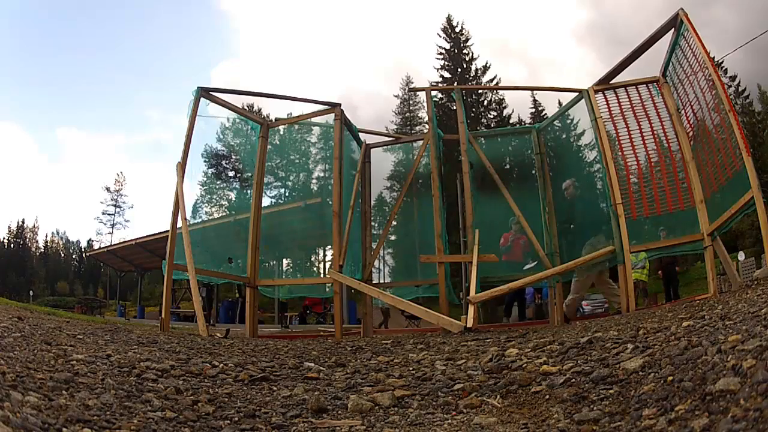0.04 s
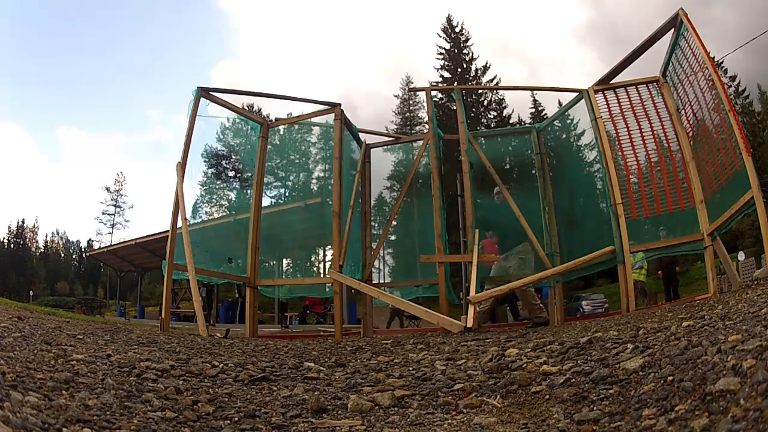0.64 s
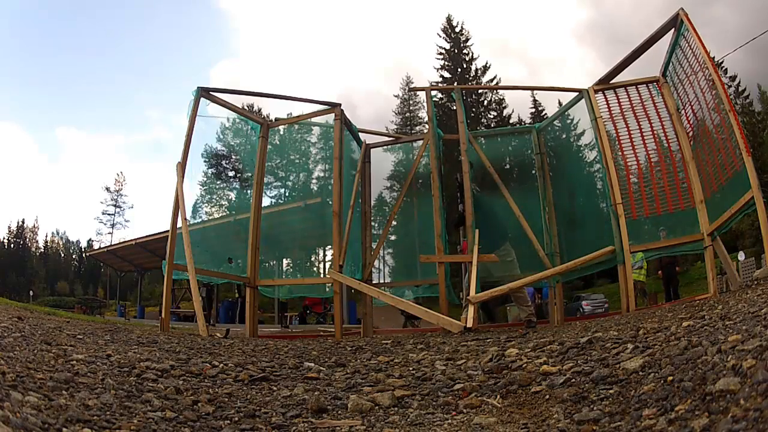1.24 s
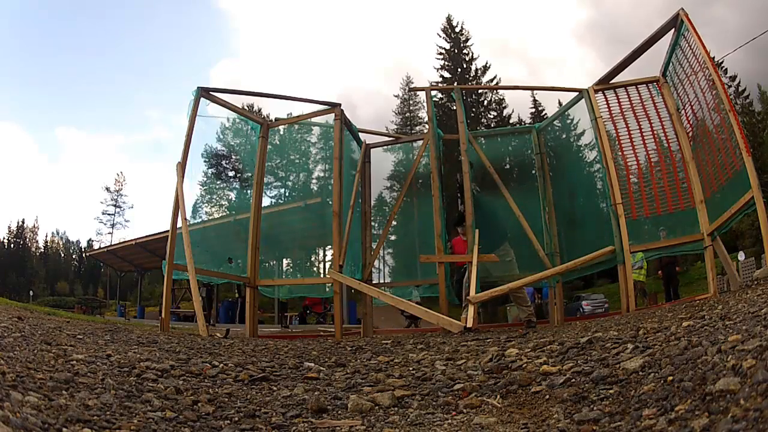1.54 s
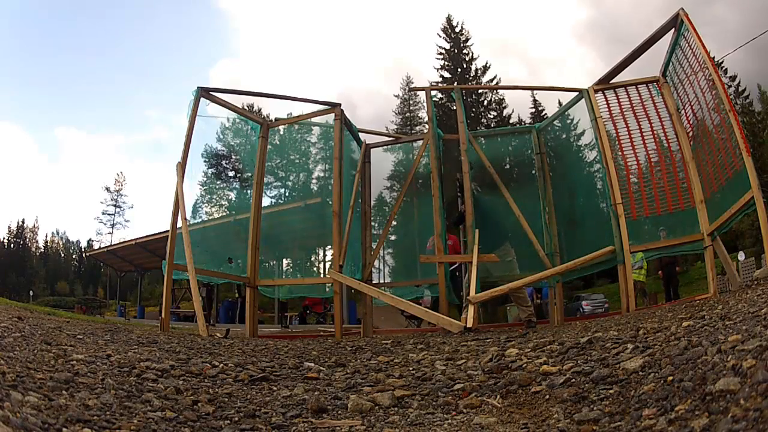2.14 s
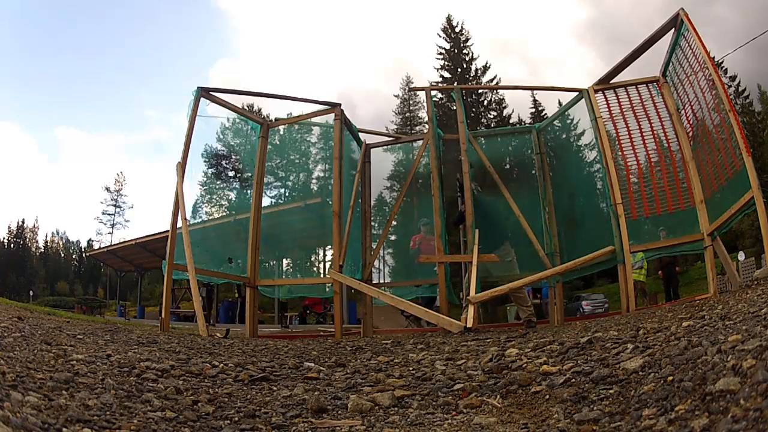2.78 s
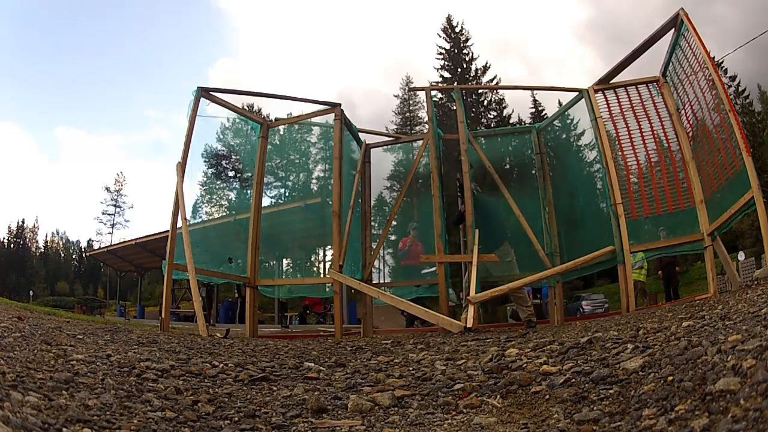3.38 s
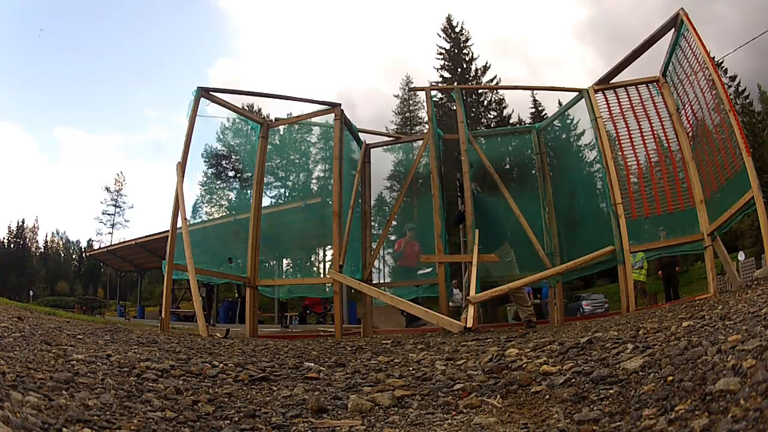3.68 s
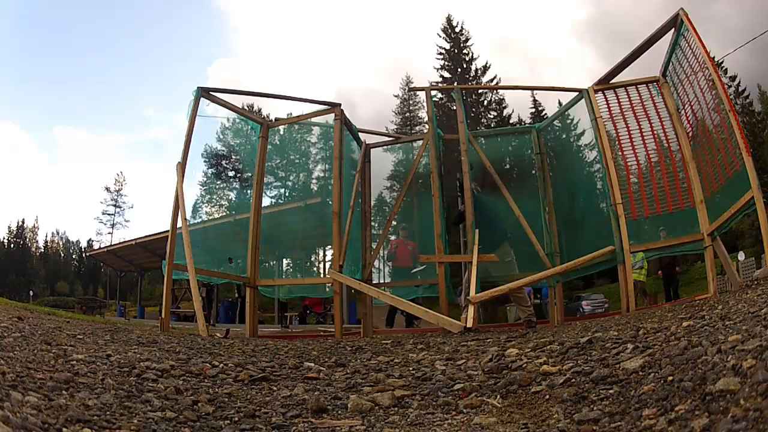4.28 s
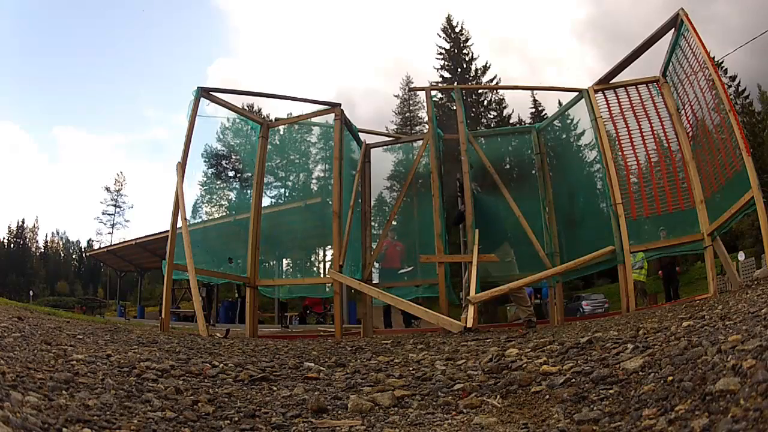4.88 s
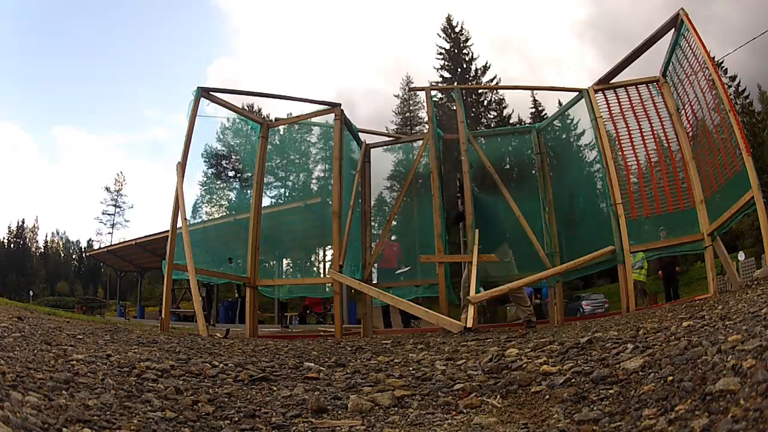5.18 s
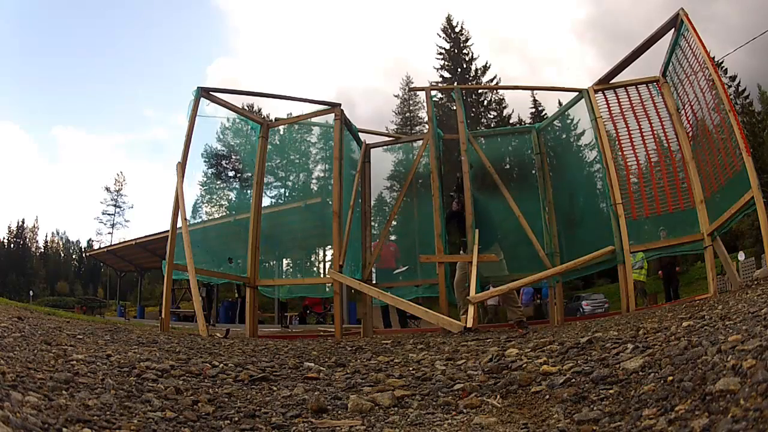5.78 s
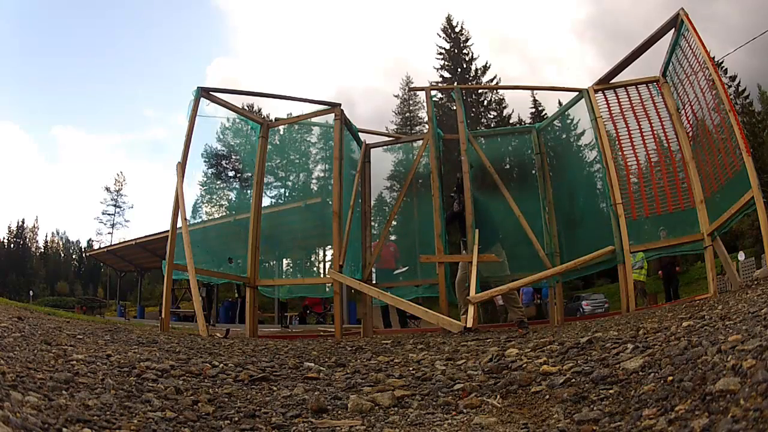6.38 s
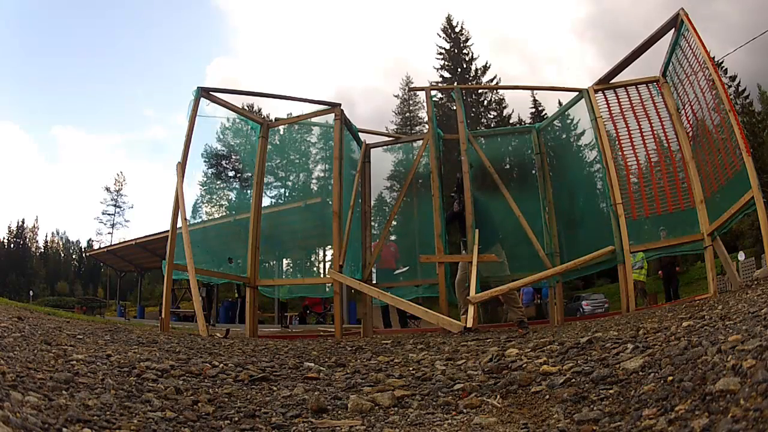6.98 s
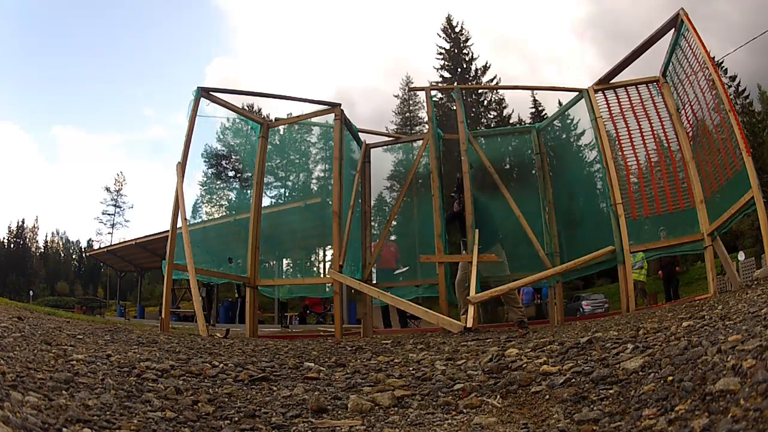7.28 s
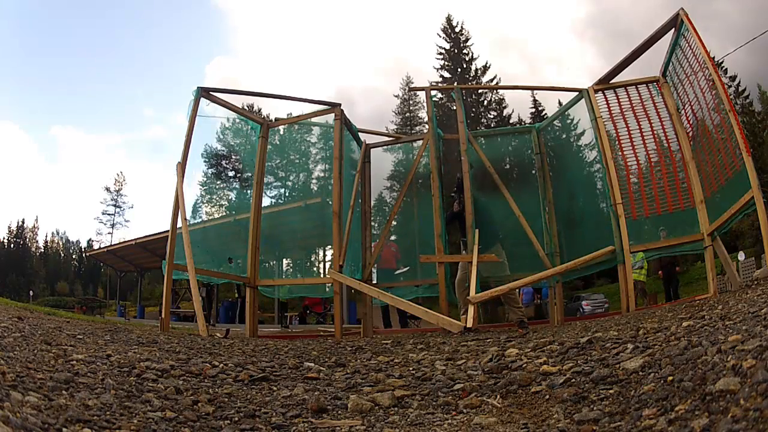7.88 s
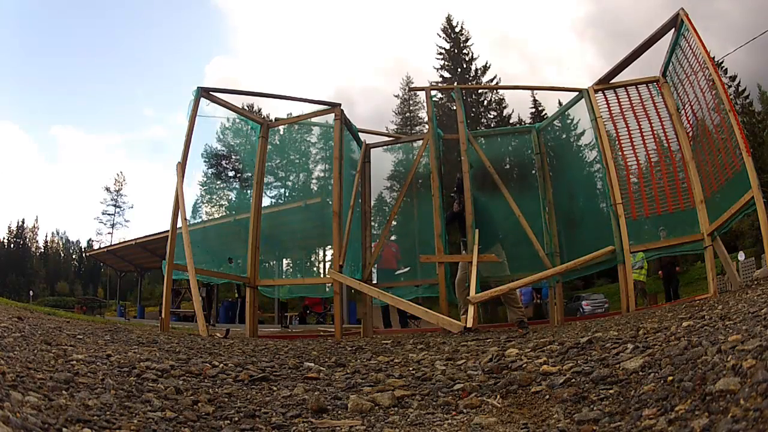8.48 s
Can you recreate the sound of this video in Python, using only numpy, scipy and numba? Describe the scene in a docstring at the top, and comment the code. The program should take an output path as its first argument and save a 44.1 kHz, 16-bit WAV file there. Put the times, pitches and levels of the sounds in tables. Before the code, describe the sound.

At a shooting range ringed by forest, a few muffled, far-off gunshots roll through quiet air. Six loud rifle shots follow nearby, fired two at a time with short pauses, and one distant shot sounds between the second and third pairs. Each close crack distorts the ground-level microphone, which dips in level and recovers as a low boom and a bright, hissing echo spread through the trees and fade.

```python
"""Rifles thump from distant bays of an outdoor range, over a faint wash of woods.
Then three pairs of shots go off close by: each is the crack of a bullet flying faster than sound,
followed by the muzzle blast. Sheds and banks slap it back, then the forest returns a long hissing roll.
The near shots overload a small cased camera lying on the gravel, which turns itself down after each."""
import sys
import numpy as np
from scipy import signal
from scipy.fft import rfft, irfft
from scipy.io import wavfile
from scipy.ndimage import uniform_filter1d
from numba import njit

SR = 44100
rng = np.random.default_rng(int(sys.argv[2]) if len(sys.argv) > 2 else 0)


def unload_wav(signal):
    """Save mono or channel-first audio to the path in sys.argv[1] as 16-bit WAV at rate SR, clipped to [-1, 1]."""
    wavfile.write(
        sys.argv[1],
        SR,
        np.round(np.clip(np.atleast_2d(signal).T, -1, 1) * 32767).astype(np.int16),
    )


N = 381024
TIME = np.arange(N) / SR
FREQS = np.fft.rfftfreq(N, 1 / SR)
FIRST_ECHO_S = .047  # delay at which the scatter from the range has fully built up
FOREST_NEAR_S, TALL_TREES_S, FOREST_FAR_S = .275, .393, .61  # echo delays: near edge, tall trees, far side


def undb(db):
    """Turn decibels into a gain."""
    return 10 ** (np.asarray(db) / 20)

def noise(colour):
    """Fresh noise of rms 1, shaped by (f/Hz, level/dB) points and falling steeply beyond them."""
    hz, db = np.transpose(colour)
    octave, marks = np.log2(FREQS + 1), np.log2(hz)
    octaves_beyond = np.abs(octave - np.clip(octave, marks[0], marks[-1]))
    gain = undb(np.interp(octave, marks, db) - 20 * octaves_beyond)
    x = irfft(rfft(rng.standard_normal(N)) * gain, N)
    return x / x.std()

def wander(rate_hz):
    """Glide between random values, mostly within -1 to 1."""
    step = int(SR / rate_hz)
    return uniform_filter1d(np.repeat(rng.standard_normal(N // step + 1), step), step)[:N]

def fade(t60):
    """Die away by 60 dB every t60 seconds."""
    return np.exp(-np.minimum(np.log(1000) * TIME / t60, 40))

def swell(rise_s, t60):
    """Grow evenly for rise_s, then die away."""
    return np.minimum(TIME / rise_s, 1) * np.exp(-np.log(1000) * np.maximum(TIME - rise_s, 0) / t60)

def burst(length_s, edge_s):
    """Start at once, hold, then collapse."""
    return .5 - .5 * np.tanh((TIME - length_s) / edge_s)

def thud(hz, cycles):
    """A short swing of air pressure that grows for `cycles` cycles, then dies away."""
    turns = hz * TIME[:SR // 5]
    age = turns / cycles
    return np.sin(2 * np.pi * turns) * age * np.exp(1 - age)

def add(out, x, start_s):
    """Mix x into out, starting at start_s."""
    i = int(round(start_s * SR))
    x, i = x[max(-i, 0):], max(i, 0)
    out[i:i + len(x)] += x[:N - i]


def air(level_db=-49):
    """The faint, wavering wash of the surrounding woods."""
    wash = noise([(30, -4), (150, -7), (550, 2.5), (1100, -14), (2200, -11), (5500, -49),
                  (9000, -29), (15000, -23.5)])  # f/Hz, level/dB
    return undb(level_db + wander(5.3)) * wash

# Tone colour of the hiss in near and distant echoes: f/Hz, level/dB
HISS = [(500, -31), (900, 3), (1200, -3), (1500, -2), (2100, 2.5), (2550, -2), (3000, 0), (4000, -11),
        (5200, -19), (6400, -22.5), (9000, -11), (10700, -16), (15000, -19)]
# Tone colour of the distant shots' rolling echo: f/Hz, level/dB
FAR_ROLL = [(130, -20), (260, -5.5), (420, -3.5), (600, -1.5), (740, -4.5), (950, -22)]
# Shots in distant bays: t/s, thump level/dB, thump f/Hz, echo delay/s, echo rise/s,
# roll level/dB, hiss level/dB
FAR_SHOTS = [(-.4, -36, 70, .2, 0.29, -34, -43), (.144, -33.5, 65, 0.16, 0.12, -36, -46),
             (.651, -27, 72, 0.095, 0.18, -35.5, -45), (1.647, -29, 64.7, 0.012, 0.32, -34.5, -42.5),
             (1.850, -28, 185, 0.059, 0.088, -40, -38.5), (6.037, -26.5, 174, 0.057, 0.074, -37, -37.5)]
def far_shots(roll_t60=4.4, hiss_t60=3.22):
    """A dull thump, a knock and a slap come over the banks; the rest arrives late via the treetops."""
    out = np.zeros(N)
    for t, thump_db, thump_hz, delay_s, rise_s, roll_db, hiss_db in FAR_SHOTS:
        add(out, undb(thump_db) * thud(thump_hz, cycles=.45), t)
        add(out, undb(-36) * thud(200, cycles=.73), t + .0165)  # knock off the shooting stage
        add(out, undb(thump_db - 6) * thud(605, cycles=.62), t + .033)  # slap
        rumble = noise([(35, 0), (70, 3.1), (130, .21)]) * fade(1.0)
        add(out, undb(thump_db - 18) * rumble, t)
        roll = undb(roll_db + wander(29.8)) * noise(FAR_ROLL) * swell(rise_s, roll_t60)
        hiss = undb(hiss_db) * noise(HISS) * swell(rise_s, hiss_t60)
        add(out, roll + hiss, t + delay_s)
    return out

def through_trees(rise, sag, fall):
    """Echo gain: rises to the forest's near edge, nearly holds inside, then falls. All rates in dB/s."""
    early_s = np.maximum(FOREST_NEAR_S - TIME, 0)
    inside_s = np.clip(TIME, FOREST_NEAR_S, FOREST_FAR_S) - FOREST_NEAR_S
    late_s = np.maximum(TIME - FOREST_FAR_S, 0)
    reached = np.clip(TIME / FIRST_ECHO_S - 1, 0, 1)  # the trees answer only after the nearer echoes
    return reached * undb(-rise * early_s - sag * inside_s - fall * late_s)

# Tone colour of the bright echo from needles and tall trees: f/Hz, level/dB
SIZZLE = [(1200, -22), (2200, 1), (3000, 6.5), (4200, 1), (5600, -16.5), (6500, -18), (7600, -6),
          (8900, -3.5), (10600, -29), (15000, -7)]
def forest_echo(far_rise_s=.06):
    """Needles and twigs scatter the treble anew each time; tall trees and the far side add surges."""
    bounced_once = undb(-32) * through_trees(rise=78, sag=-.5, fall=39.5)
    bounced_often = undb(-39) * through_trees(rise=70, sag=-2.5, fall=16.5)
    needles = undb(-34) * through_trees(rise=44, sag=6.5, fall=81)
    out = np.hypot(bounced_once, bounced_often) * noise(HISS) + needles * noise(SIZZLE)
    add(out, undb(-26) * noise(SIZZLE) * swell(.0067, t60=.52), TALL_TREES_S)
    add(out, undb(-35) * noise(HISS) * swell(far_rise_s, t60=.78), FOREST_FAR_S - far_rise_s)
    flicker_db = .9 * wander(70)
    return undb(flicker_db) * out

def spreading(first_db, db_per_decade, absorb_db_per_s):
    """Echo gain: the later sound returns, the farther it has spread and the more is soaked up."""
    delay_ratio = TIME / FIRST_ECHO_S
    spread_db = db_per_decade * np.log10(np.maximum(delay_ratio, 1))
    too_early_db = 60 * np.clip(1 - delay_ratio, 0, 1)
    return undb(first_db - spread_db - absorb_db_per_s * TIME - too_early_db)

# Tone colours of the deep boom, the roll above it and the crack off wood and earth: f/Hz, level/dB
BOOM = [(25, -29), (55, -13.5), (110, -6), (160, -1), (230, -2.5), (300, -4), (500, -45)]
ROLL = [(150, -29), (250, -0.5), (400, 1), (580, 0), (730, -2.5), (850, -11.5), (1100, -25.5), (2000, -34)]
RATTLE = [(600, 0), (1000, 0), (2200, -1), (3200, -3.5), (4500, -13.5), (6400, -26), (9000, -16),
          (15000, -16)]
# How boom and roll fade: first level/dB, spreading loss/dB per tenfold delay, absorption/dB per s
BOOM_FADE = (-19.5, 15.2, 14.3)
ROLL_FADE = (-9.5, 24.3, 9.1)
# Single echoes off sheds and earth banks: t/s after the shot, level/dB, f/Hz
SLAPS = [(0.0164, 2, 428), (0.034, -7.5, 400), (0.055, -7.5, 533), (0.123, -12, 390), (.184, -14, 313),
         (.260, -20.5, 202), (.322, -17, 382), (.338, -30, 180), (.351, -20, 365), (0.399, -22.5, 240),
         (0.422, -19.5, 232)]
def terrain_echo(rattle_db=-12, rattle_loss_db_per_s=22):
    """Ground, banks and trunks return a low echo; each shed or bank adds a thud and some of the crack."""
    trunks = undb(-29.5) * through_trees(rise=73, sag=2.5, fall=18)
    out = np.hypot(spreading(*BOOM_FADE), undb(-15.5) * trunks) * noise(BOOM)
    flutter = undb(2.1 * wander(60.53))
    out += flutter * np.hypot(spreading(*ROLL_FADE), trunks) * noise(ROLL)
    for delay_s, db, hz in SLAPS:
        add(out, undb(db) * thud(hz, cycles=.8), delay_s)
        rattle = noise(RATTLE) * fade(.069)
        add(out, undb(db + rattle_db - rattle_loss_db_per_s * delay_s) * rattle, delay_s)
    return out

def stage_clatter():
    """The crack bounces about the nearby frames and screens and soon dies."""
    out = np.zeros(N)
    add(out, undb(-19) * noise(HISS) * swell(.011, t60=.21), start_s=.035)
    return out

# Tone colour of the bullet's crack: f/Hz, level/dB
CRACK = [(400, -10.5), (1500, 5), (2900, -4), (4500, -4.5), (6200, -7.5), (9000, -14.5), (15000, -14)]
def bullet_crack(ring_hz=2900):
    """The bullet outruns sound, making a sharp snap with a brief ring."""
    ring = np.sin(2 * np.pi * ring_hz * TIME) * fade(.022)
    snap = undb(-13.5) * noise(CRACK) - undb(-11) * ring
    return snap * (burst(.0015, .0013) + undb(-4) * burst(.01263, .001))

# Tones ringing between gravel and stage walls: f/Hz, level/dB, time to fade by 60 dB/s
BLAST_TONES = [(172.5, 1, 0.049), (275, -6.5, 0.14), (377, 0, 0.035), (623, -2.5, 0.072),
               (711, -4.5, 0.096), (1047, -3, 0.032), (1530, -11, 0.036)]
# Tone colour of the rushing muzzle gas: f/Hz, level/dB
GAS = [(200, 5), (500, 19.5), (1000, 0), (1600, 0), (3000, -7.5), (6000, -18), (9000, -6), (15000, -30)]
def muzzle_blast(ring_db, gas_db):
    """Gas rushes out of the barrel, and the blast rings briefly between gravel and walls."""
    ring = sum(undb(db) * np.sin(2 * np.pi * hz * TIME) * fade(t60) for hz, db, t60 in BLAST_TONES)
    gas = noise(GAS) * fade(.058)
    return (undb(ring_db) * ring + undb(gas_db) * gas) * burst(.027, .0011)

def rifle(ring_db, swing_db, crack_db, gas_db, muzzle_lag_s=.0034, swing_hz=52):
    """The crack arrives first, the blast just behind it; a slow swing of air pressure lies under both."""
    out = undb(crack_db) * bullet_crack()
    add(out, muzzle_blast(ring_db, gas_db), muzzle_lag_s)
    swing = np.sin(2 * np.pi * swing_hz * TIME) * burst(.02, .0049)
    return out - undb(swing_db - 8) * swing

# The close shots: t/s; relative level/dB of blast ring, pressure swing, crack, gas, terrain echo
# and forest echo; extra forest delay/s
NEAR_SHOTS = [(2.1867, 0, 1.5, 3, -2, 1, 0.5, .012), (2.837, 1.5, 0, 2, -2.5, 1.5, -0.5, .012),
              (4.1551, -8.5, -3, -2, -2.5, 0.5, -0.5, 0), (4.8284, -6, 0, -0.5, -3.5, 0.5, -1.5, -0.0013),
              (7.1026, -0.5, 3.5, -0.5, -5, 1, 0, -.013), (7.7367, 1.5, 4.5, -5, -3.5, 1, -0.5, -0.012)]
def near_shots():
    """Shots with their echoes; the shooter moves between pairs, so the forest answers sooner or later."""
    out = np.zeros(N)
    terrain, clatter = terrain_echo(), stage_clatter()  # these stand still, so every shot shares them
    for t, ring_db, swing_db, crack_db, gas_db, terrain_db, forest_db, forest_lag_s in NEAR_SHOTS:
        shot = rifle(ring_db, swing_db, crack_db, gas_db)
        add(out, shot + clatter + undb(terrain_db) * terrain, t)
        add(out, undb(forest_db) * forest_echo(), t + forest_lag_s)
    return out

def scene():
    """Everything that reaches the camera, in one channel."""
    return (near_shots() + far_shots() + air())[None]


@njit
def gain_control(x, threshold, lag_s, depth_db, attack_s, release_db_per_s):
    """The camera reacts late to an overload, turns itself far down, then creeps back up."""
    y, cut_db, lag = np.zeros(len(x)), 0., int(lag_s * SR)
    for i in range(len(x)):
        if i >= lag and abs(y[i - lag]) > threshold:
            cut_db += (depth_db - cut_db) / (attack_s * SR)
        else:
            cut_db = max(cut_db - release_db_per_s / SR, 0.)
        y[i] = x[i] * 10 ** (-cut_db / 20)
    return y

# Pitches that the camera's case boosts or dulls: f/Hz, width/Hz, level/dB
CASE_RESONANCES = [(9200, 900, 2), (11400, 450, 6), (12000, 450, -11), (12600, 400, 5), (13300, 700, -3),
                   (15050, 500, 3)]
def record(dry, ceiling=.69, low_cut_hz=16, top_cut_hz=15500):
    """Blasts overload the input; the case colours the treble; deep bass and the very top are cut."""
    ducked = gain_control(dry[0], threshold=.55, lag_s=.0105, depth_db=20., attack_s=.0012,
                          release_db_per_s=60.)
    clipped = ducked / (1 + (ducked / ceiling) ** 6) ** (1 / 6)  # rounds off the peaks
    case_db = sum(db * np.exp(-2 * ((FREQS - hz) / width) ** 2) for hz, width, db in CASE_RESONANCES)
    coloured = irfft(rfft(clipped) * undb(case_db), N)
    low_cut = signal.butter(1, low_cut_hz, "high", fs=SR, output="sos")
    top_cut = signal.ellip(10, .2, 70, top_cut_hz, fs=SR, output="sos")
    return signal.sosfilt(np.vstack([low_cut, top_cut]), coloured)[None]


dry = scene()
out = record(dry)
unload_wav(out)
```